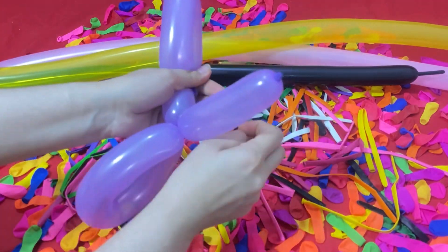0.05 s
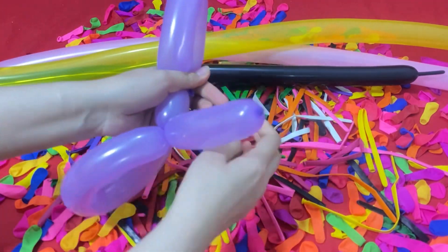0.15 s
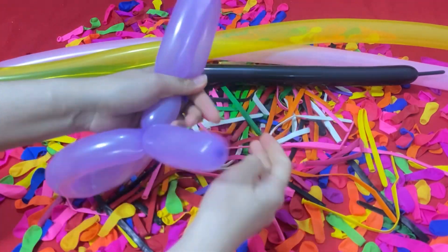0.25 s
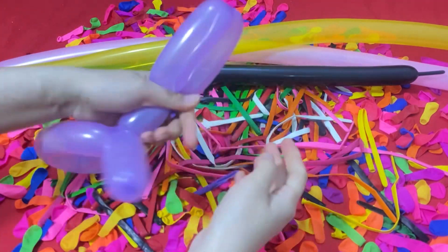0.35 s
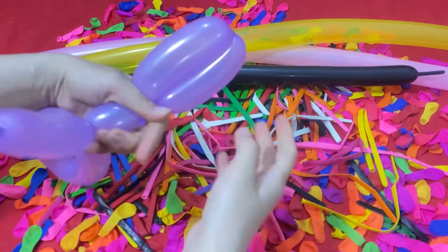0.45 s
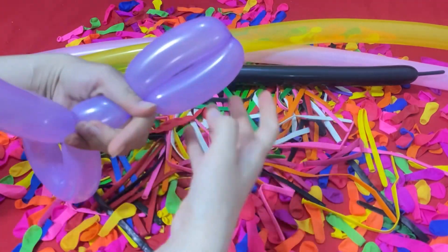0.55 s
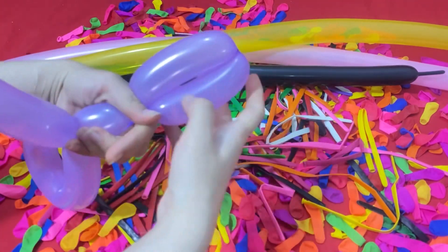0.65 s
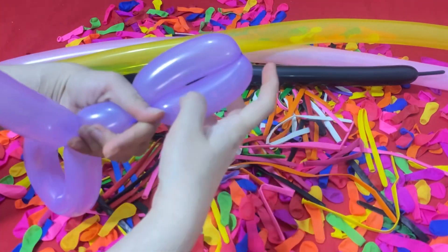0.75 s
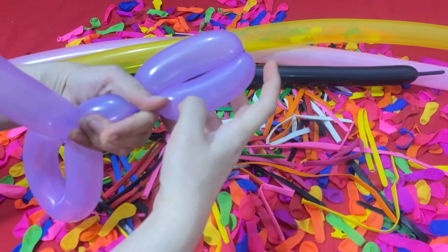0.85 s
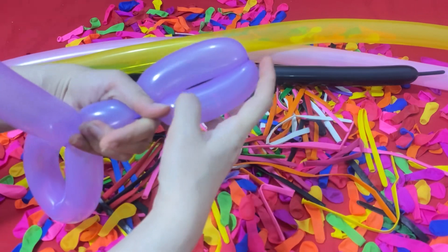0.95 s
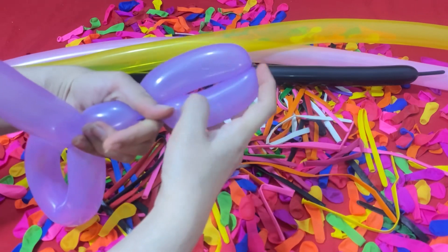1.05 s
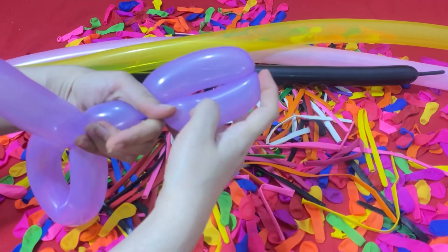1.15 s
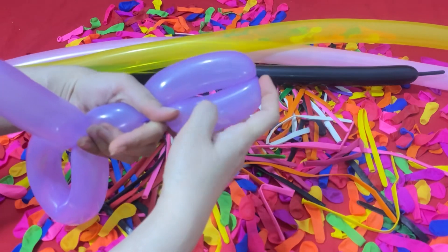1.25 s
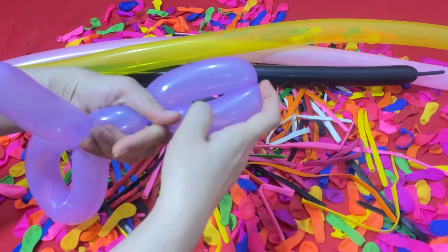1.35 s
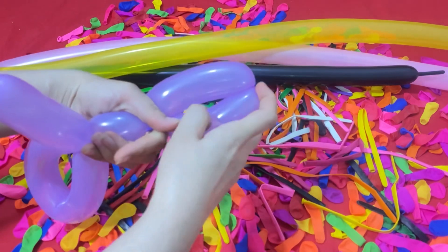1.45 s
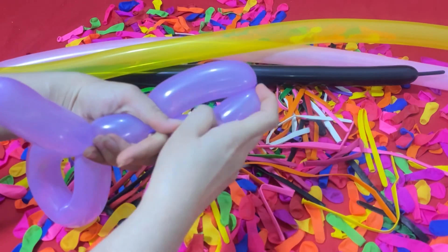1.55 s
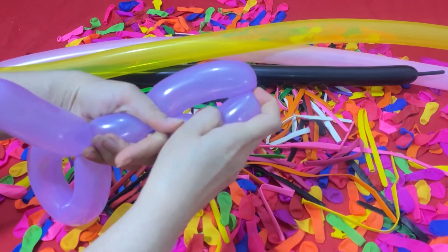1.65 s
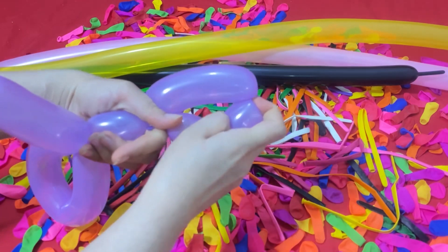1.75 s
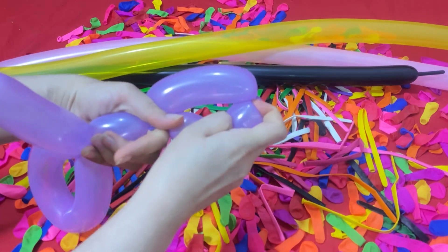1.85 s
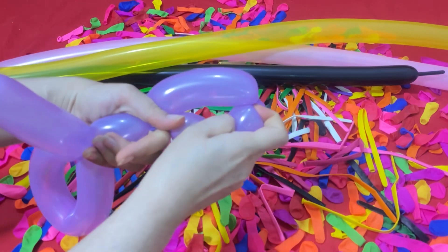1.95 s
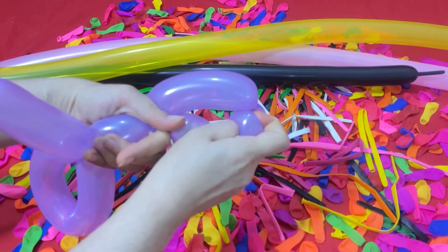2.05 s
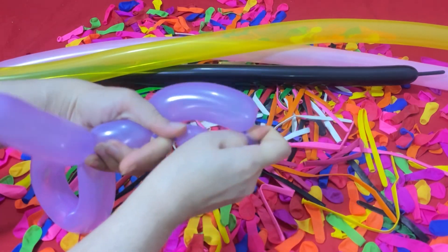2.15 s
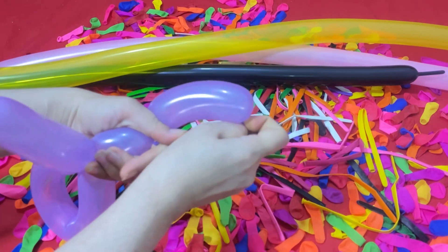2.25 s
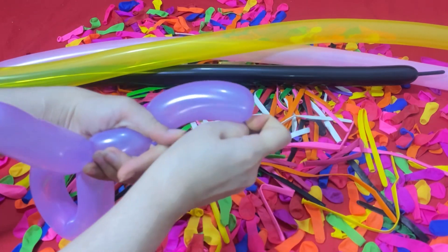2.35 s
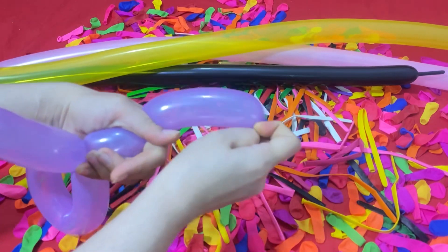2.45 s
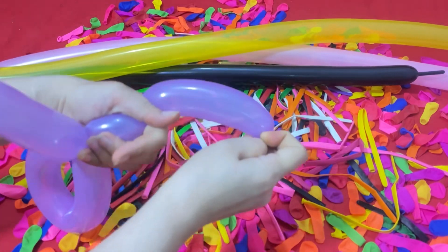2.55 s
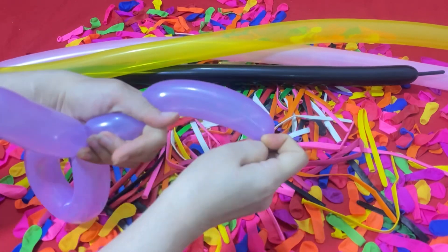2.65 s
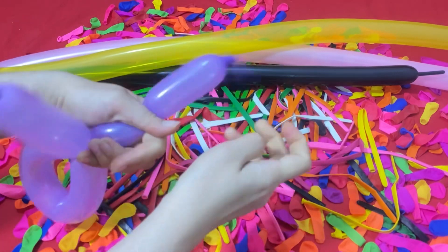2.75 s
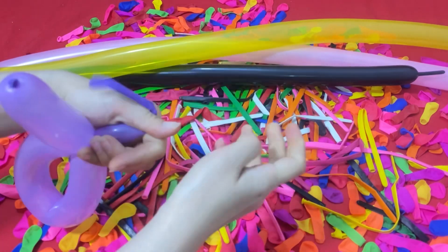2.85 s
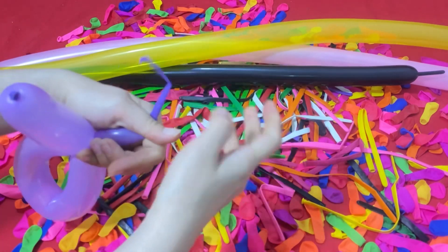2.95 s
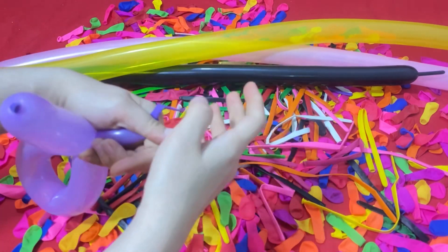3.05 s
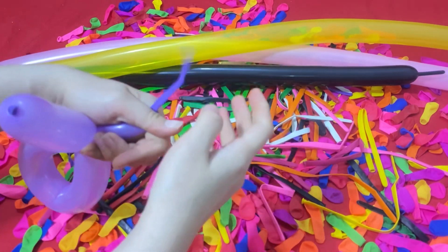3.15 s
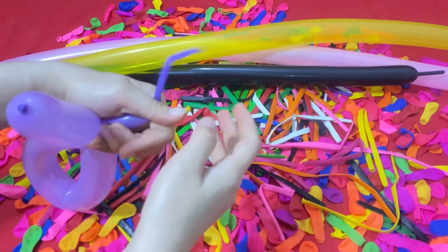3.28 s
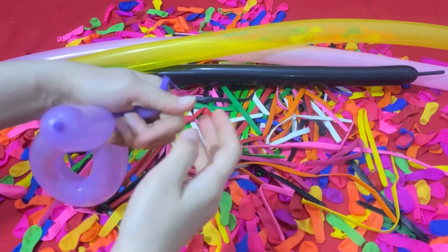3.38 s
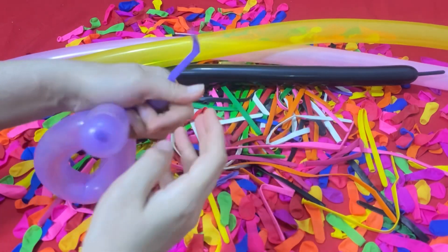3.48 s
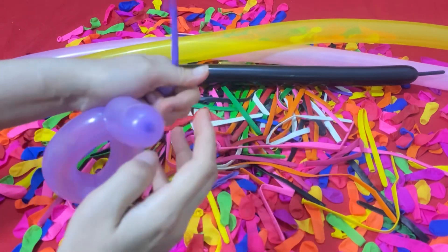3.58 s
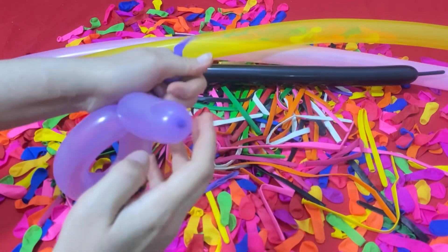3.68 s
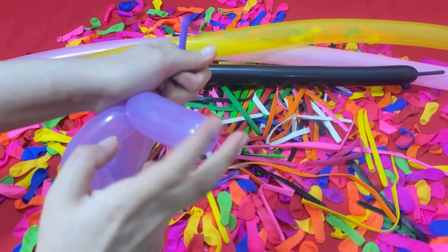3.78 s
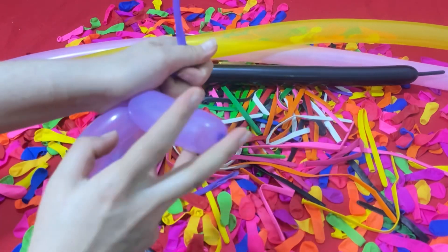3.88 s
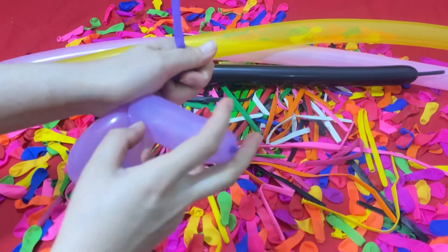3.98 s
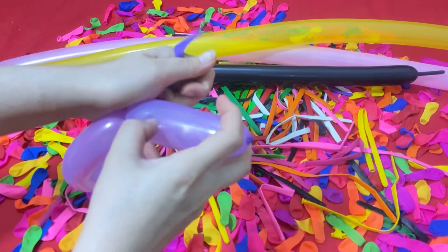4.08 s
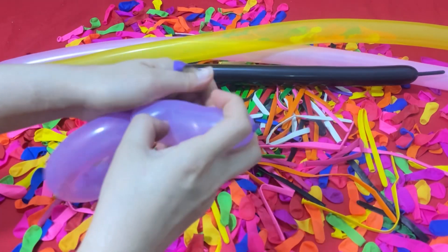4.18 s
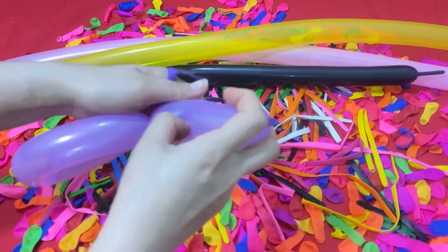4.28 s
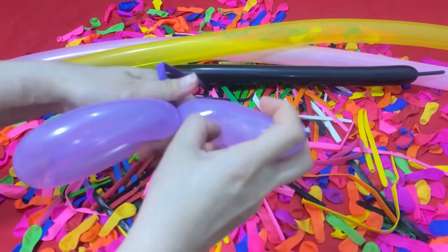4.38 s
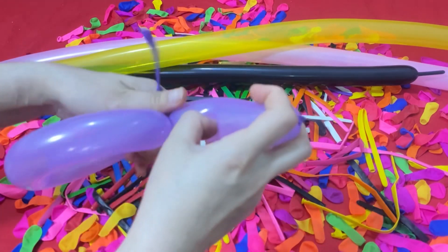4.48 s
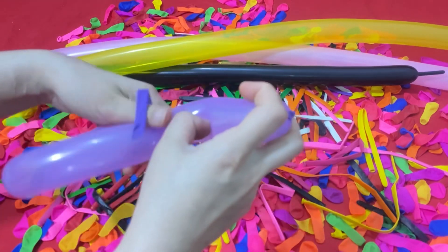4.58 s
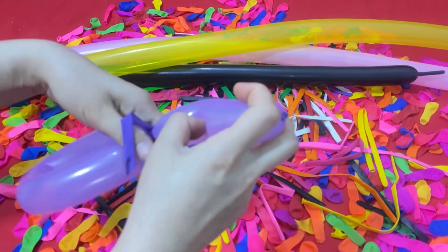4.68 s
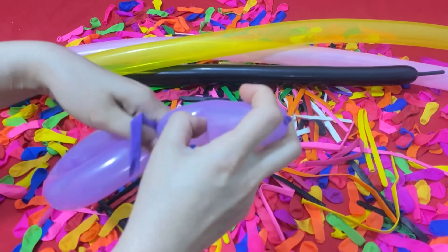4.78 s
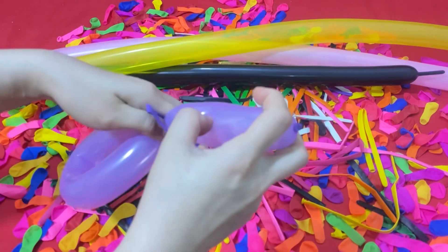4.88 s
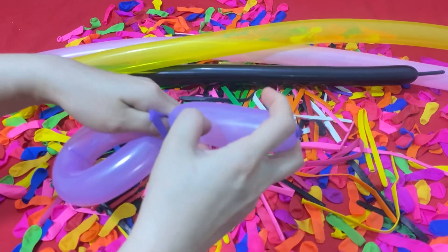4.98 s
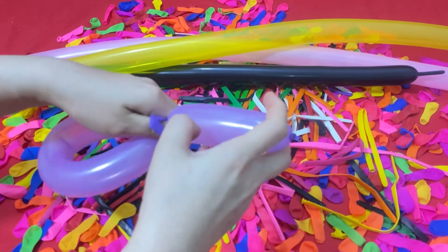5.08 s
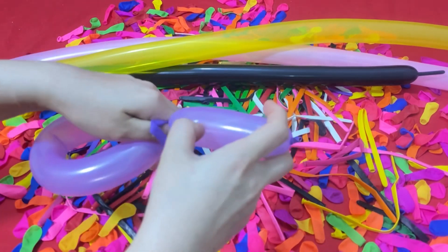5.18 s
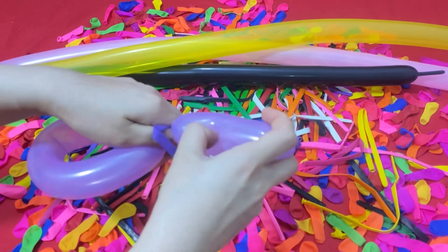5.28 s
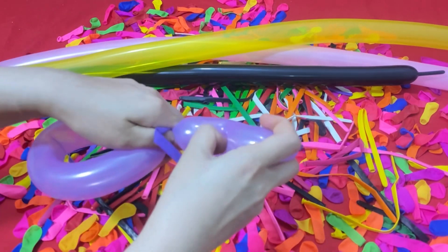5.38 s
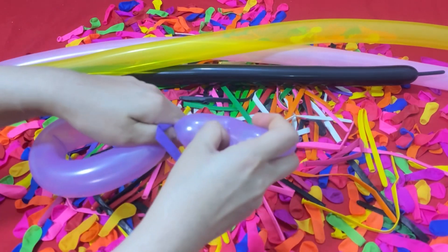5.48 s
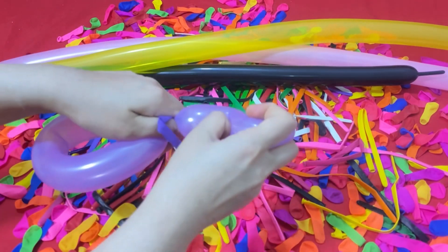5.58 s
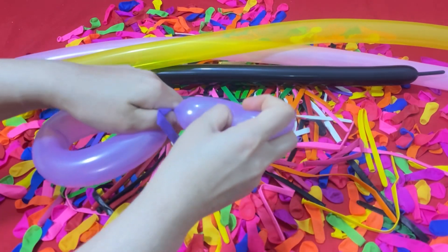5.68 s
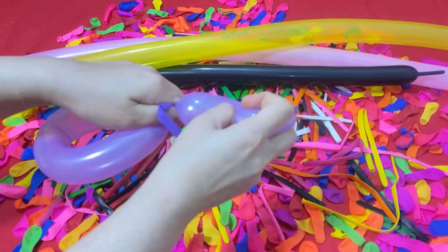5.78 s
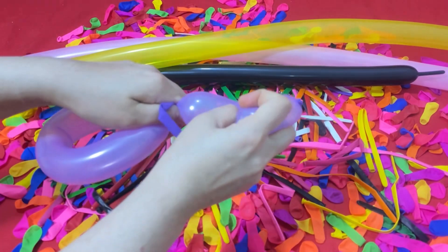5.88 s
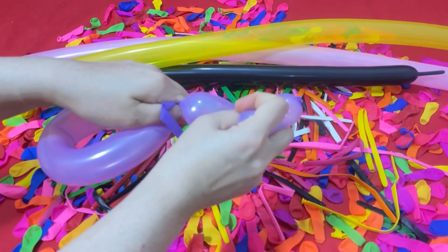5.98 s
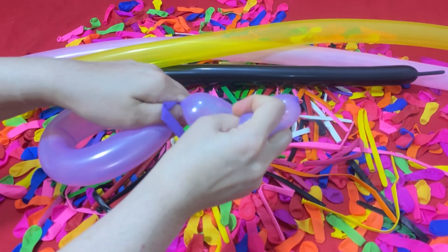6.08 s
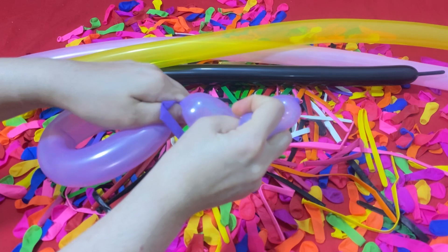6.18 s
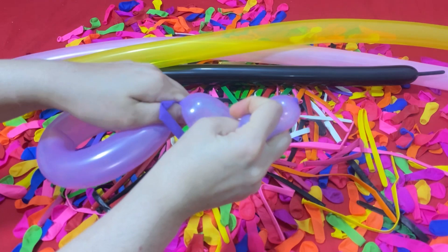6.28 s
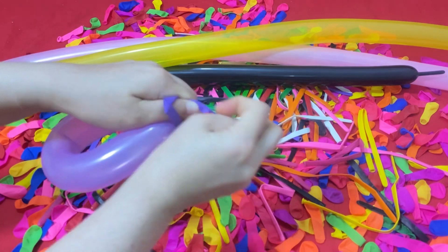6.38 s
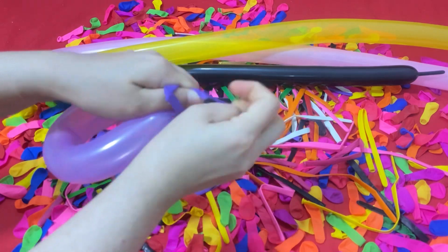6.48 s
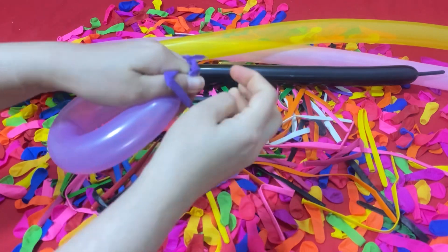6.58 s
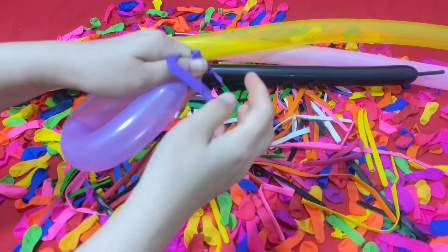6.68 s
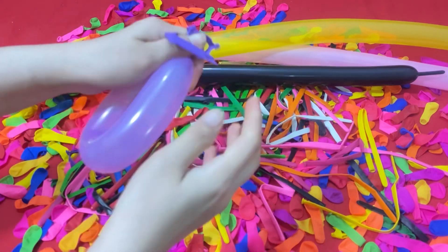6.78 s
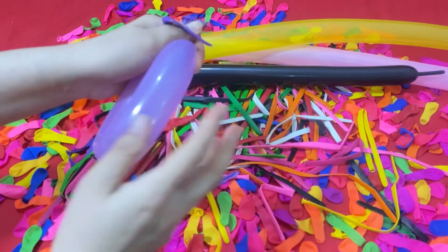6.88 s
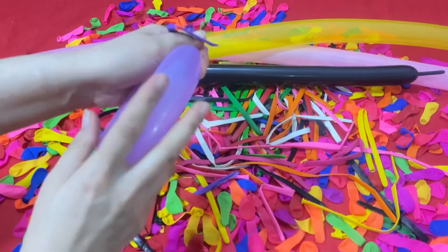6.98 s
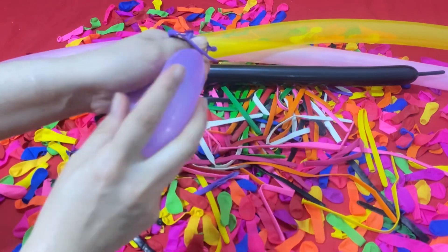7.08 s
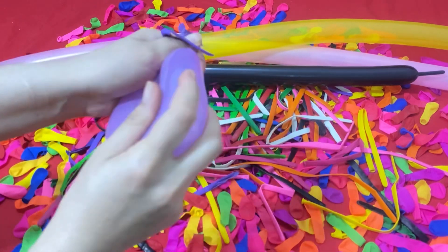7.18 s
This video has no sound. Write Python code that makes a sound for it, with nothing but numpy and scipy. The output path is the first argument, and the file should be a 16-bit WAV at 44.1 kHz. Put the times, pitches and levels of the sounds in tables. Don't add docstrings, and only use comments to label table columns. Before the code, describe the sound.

A burst's echo fades, rubber squeaks and snaps under fingers, a segment vents with a slap, then another balloon pops loudly.

```python
import sys
import numpy as np
from scipy import signal
from scipy.fft import rfft, irfft, next_fast_len
from scipy.io import wavfile
from scipy.ndimage import uniform_filter1d

SR = 44100
rng = np.random.default_rng(int(sys.argv[2]) if len(sys.argv) > 2 else 0)


def materialize(psi):
    bounded = np.clip(np.atleast_2d(psi).T, -1, 1)
    quanta = np.round(bounded * 32767).astype(np.int16)
    wavfile.write(sys.argv[1], SR, quanta)


def to_linear_factor(level_db):
    exponent = np.asarray(level_db, float) / 20
    return 10 ** exponent


N = 319284
LEAD = 8192


def evened(x):
    return x / np.sqrt(np.mean(x ** 2) + 1e-20)


def smooth_noise(shape, width):
    return evened(uniform_filter1d(rng.standard_normal(shape), width))


def read(points, hz):
    f, value = np.transpose(points)
    return np.interp(np.log(hz + 1), np.log(f + 1), value)


def coloured(x, points):
    count = x.shape[-1]
    gain = to_linear_factor(read(points, np.fft.rfftfreq(count, 1 / SR)))
    return evened(irfft(rfft(x) * gain, count))


def add(layer, s, sound, pan_db=0):
    part = layer[:, LEAD + round(s * SR):][:, :len(sound)]
    half_db = np.clip(pan_db, -5, 5) / 2
    part += to_linear_factor([[half_db], [-half_db]]) * sound[:part.shape[1]]


def resonate(x, hz, width):
    turn = np.exp(2j * np.pi * np.cumsum(hz) / SR)
    r = np.exp(-np.pi * width / SR)
    return 2 * (turn * signal.lfilter([1 - r], [1, -r], x / turn)).real


def grains(count, per_s, spread_db):
    hit, size, sign = rng.random(count), rng.exponential(1, count), rng.standard_normal(count)
    return evened((hit < per_s / SR) * sign * to_linear_factor(spread_db * np.minimum(size, 4)))


def controls(rows):
    s, *columns = np.transpose(rows)
    t = np.arange(s[0], s[-1], 1 / SR)
    return s[0], signal.windows.tukey(len(t), 800 / len(t)), [np.interp(t, s, c) for c in columns]


def ring(modes, rise_s, wobble, shiver_s):
    t = np.arange(0, .02 + max(t60 for _, _, t60 in modes), 1 / SR)
    shiver = smooth_noise((len(modes), SR // 3), round(shiver_s * SR))[:, :len(t)]
    t = t[:shiver.shape[1]]
    wave = 0
    for (hz, db, t60), unsteady in zip(modes, shiver):
        tone = np.sin(2 * np.pi * (hz * t + rng.random()))
        wave = wave + to_linear_factor(db - 60 * t / t60) * (1 + wobble * unsteady) * tone
    wave = wave * (1 - np.exp(-(t / rise_s) ** 2))
    return wave / abs(wave).max()


# (f/Hz, level/dB per Hz)
SNAP = [(700, -38.5), (1500, -7), (2600, -5.5), (5000, -7.5), (8000, -7.5), (11000, -9.5), (13500, -26.5),
        (15500, -20.5), (16500, -54)]


def snap(t60, count):
    t = np.arange(count) / SR
    shape = to_linear_factor(-60 * t / t60) * (1 - np.exp(-t / 0.00052))
    z = rfft(rng.standard_normal(4096)[np.arange(count) % 4096] * shape)
    even = irfft(z / abs(z), count)
    wave = coloured(even * np.sqrt(shape), SNAP) * (1 - np.exp(-t / .0003))
    return wave / abs(wave).max()


def slip(db, hz, treble_db, t60, tube):
    modes = []
    for ratio, share_db in tube:
        detune = rng.uniform(.97, 1.03) ** (ratio > 1.1)
        modes.append((hz * ratio * detune, share_db, t60 / ratio ** 0.36))
    body = ring(modes, 0.0006, 0.6, 0.0025)
    return to_linear_factor(db) * body, to_linear_factor(treble_db) * snap(min(0.6 * t60, .018), len(body))


# (f as a ratio to the ring, level/dB)
TUBE = [(.62, 0), (1, 19), (1.55, 1), (2.1, -8), (3.3, -26), (4.401, -37)]
# (f as a ratio to the ring, level/dB)
PIPE = [(1.01, 8), (1.14, 2.5), (1.68, -2), (2.08, 4.5), (2.6, -0.5), (3.5, 4)]
# (t/s, peak level/dB, ring f/Hz, snap level/dB)
PINCH = [(1.085, -50, 930, -49), (1.113, -48, 895, -40.5), (1.115, -47, 1900, -59), (1.39, -60.5, 900, -69),
         (1.652, -55.5, 1600, -57), (1.475, -47, 1930, -48.5), (1.55, -54.5, 1740, -48),
         (1.571, -44.5, 1900, -41), (1.636, -59, 2590, -51), (1.738, -57.5, 2300, -49),
         (1.844, -65.5, 2040, -55), (1.884, -48.5, 1690, -42), (1.93, -65, 2000, -54),
         (1.954, -53.5, 1710, -68), (2.16, -36, 1068, -30), (2.17, -46.5, 1207, -41),
         (2.466, -56.5, 1270, -40.5), (2.654, -62, 1650, -34.5)]
# (t/s, peak level/dB, ring f/Hz, snap level/dB)
PINGS = [
    (2.387, -53, 2960, -39.5),
    (2.398, -43.5, 1703, -34.5),
]
# (t/s, peak level/dB, ring f/Hz, snap level/dB)
WHIP = [
    (2.728, -33, 820, -24),
    (2.741, -34.5, 886, -33.5),
    (2.753, -31.5, 1410, -20.5),
    (2.792, -45.5, 880, -29.5),
    (2.813, -39, 3000, -23.5),
    (2.801, -35.5, 640, -26),
]
# (t/s, peak level/dB, ring f/Hz, snap level/dB)
TURN = [
    (3.954, -72, 2840, -58),
    (4.088, -60, 2330, -39),
    (4.102, -50, 2100, -36.5),
    (7.117, -32.5, 1770, -31.5),
    (7.134, -35.5, 1520, -30),
    (7.149, -29.5, 1990, -34),
    (7.202, -24, 2403, -23.5),
]
# (t/s, peak level/dB, ring f/Hz, snap level/dB)
PRESS = [(4.682, -38, 819, -42.5), (4.714, -33, 833, -37.5), (4.729, -34, 830, -38.5),
         (4.766, -49, 820, -62), (4.79, -50, 820, -56), (4.859, -51.5, 753, -50), (4.954, -47, 706, -48),
         (4.984, -45.5, 1600, -45), (4.998, -51, 625, -60), (5.016, -52, 737, -48), (5.027, -47, 742, -47),
         (5.111, -53, 655, -56), (5.244, -55, 700, -54), (5.273, -57, 693, -68), (5.288, -62, 760, -64),
         (5.33, -63, 860, -57), (5.352, -59, 970, -62), (5.372, -67, 970, -50), (5.39, -59, 920, -52),
         (5.407, -54, 1000, -59), (5.432, -56, 1025, -55)]
# (t/s, peak level/dB, ring f/Hz, snap level/dB)
CREAK = [
    (5.461, -52, 1500, -46),
    (5.485, -50, 1466, -40),
    (5.534, -42.5, 1108, -35),
    (5.577, -38.5, 1684, -44),
]
# (t/s, peak level/dB, ring f/Hz, snap level/dB)
CRUSH = [(5.688, -49, 1590, -39.5), (5.701, -44, 1510, -49), (5.736, -54, 1650, -46),
         (5.78, -35, 1503, -41), (5.859, -76, 1770, -37.5), (5.89, -51, 1690, -43), (6.008, -47, 1760, -42),
         (6.04, -51.5, 1950, -53), (6.115, -59, 4300, -69), (6.102, -60, 1500, -69),
         (6.224, -68, 2500, -52), (6.173, -64, 2810, -50.5), (6.205, -64, 5300, -49),
         (6.235, -59, 4200, -54), (6.278, -63, 2000, -57)]
# (slips, tube, ring t60/s, left-right level/dB, swing from side to side level/dB)
HANDS = [
    (PINCH, TUBE, 0.023, -1.7, .6),
    (PINGS, TUBE, 0.049, -1.3, .3),
    (WHIP, TUBE, 0.015, .3, -8),
    (TURN, TUBE, 0.016, -.6, 0.55),
    (PRESS, PIPE, 0.052, 0.29, .6),
    (CREAK, TUBE, 0.057, -8, -1.5),
    (CRUSH, TUBE, 0.021, -9, 0.25),
]


def play_slips(close, rings):
    for slips, tube, t60, pan_db, swing_db in HANDS:
        for k, (s, db, hz, treble_db) in enumerate(slips):
            side_db = pan_db + swing_db * (-1) ** k
            body, tick = slip(db, hz, treble_db, t60, tube)
            add(rings, s, body, side_db)
            add(close, s, tick, side_db)


def squeak(curve, rings, uneven, smear):
    s, ends, (db, per_s, stretch) = controls(curve)
    wander, size = smooth_noise((2, SR // 4), 200)[:, :len(db)]
    turns = np.cumsum(per_s * (1 + uneven * np.tanh(wander))) / SR
    knocks = evened(np.diff(np.floor(turns), prepend=0))
    drag_on = np.exp(-(turns % 1) / 0.4) * rng.standard_normal(SR // 4)[:len(db)]
    slips = ((1 - smear) * knocks + smear * evened(drag_on)) * to_linear_factor(3 * uneven * size)
    body = 0
    for k, (hz, width, ring_db) in enumerate(rings):
        once = resonate(slips, hz * stretch, width)
        twice = resonate(once, hz * stretch, width)
        body = body + (-1) ** k * to_linear_factor(ring_db) * twice / np.sqrt(width)
    return s, ends * to_linear_factor(db) * evened(body)


# (t/s, level/dB, slip rate f/Hz, stretch of the rings as a ratio)
CHIRP = [
    (1.483, -64, 450, 0.99),
    (1.492, -58, 420, 1.1),
    (1.508, -57, 310, 1),
    (1.523, -52.5, 215, 1.08),
    (1.541, -54, 180, 1),
]
# (t/s, level/dB, slip rate f/Hz, stretch of the rings as a ratio)
GROAN = [
    (5.47, -55, 130.3, 0.94),
    (5.488, -54.5, 139.9, .98),
    (5.505, -51, 141, 1.03),
    (5.535, -44, 159.3, 0.99),
    (5.55, -46.5, 150.1, 0.95),
    (5.568, -47, 139.5, 1.01),
    (5.58, -47.5, 139, 1.01),
    (5.6, -51.5, 130.7, 0.97),
    (5.64, -62, 122, 0.92),
]
# (curve, rings [(f/Hz, width f/Hz, level/dB)], unevenness, smear 0-1, left-right level/dB)
SQUEAKS = [
    (CHIRP, [(1860, 450, -1.5), (2300, 550, -3.5), (2890, 600, -9), (4200, 1200, -15)], 0.035, .15, -.6),
    (GROAN, [(870, 290, -11.5), (1125, 160, 0), (1500, 140, 0.5), (1670, 170, -5), (2030, 170, -9), (2360, 180, -13), (2700, 160, -9), (3290, 200, -14), (4300, 500, -15)], .5, 0.56, -2),
]


def play_squeaks(rings):
    for *beat, pan_db in SQUEAKS:
        add(rings, *squeak(*beat), pan_db)


# (f/Hz, level/dB per Hz)
RUSTLE = [(700, -26.5), (1500, -6.5), (2400, -2), (5000, -8.5), (8000, -9), (11000, -9.5), (13500, -21.5),
          (15500, -22.5), (16500, -49)]
# (f/Hz, level/dB per Hz)
GRIP = [(20, -21), (60, 2.5), (100, -29), (200, 8.5), (400, 2), (700, -5.5), (1500, -43)]


def drag(rows, width_hz):
    s, ends, (creak_db, hz, rustle_db, grip_db) = controls(rows)
    count = len(hz)
    slips = grains(count, 2000, 3.) + .9 * rng.standard_normal(count)
    creak = sum(to_linear_factor(db) * resonate(slips, hz * ratio, width_hz * ratio) for ratio, db in TUBE)
    rustle = coloured(grains(count, 2500, 3.) + .8 * rng.standard_normal(count), RUSTLE)
    grip = coloured(rng.standard_normal(count), GRIP)
    sound = to_linear_factor(creak_db - 7.5) * evened(creak) + to_linear_factor(rustle_db) * rustle + to_linear_factor(grip_db - 14.0) * grip
    return s, ends * sound


def stroke(curve, rustle_db, grip_db, width_hz):
    s, sound = drag([(s, db, hz, db + rustle_db, db + grip_db) for s, db, hz in curve], width_hz)
    lump_db, lump_s = 3.2, 0.017
    lumps = smooth_noise(SR * 2, round(lump_s * SR))
    return s, sound * to_linear_factor(lump_db * lumps[:len(sound)])


# (t/s, pressure level/dB, ring f/Hz)
FOLD = [(.6, -67.5, 1510), (.77, -71, 1650), (1.13, -64.5, 1400), (1.43, -56.5, 1360), (1.5, -62.5, 1950),
        (1.73, -63.5, 1800), (1.8, -64.5, 1500), (2.0, -64.5, 1450), (2.1, -67, 1880)]
# (t/s, pressure level/dB, ring f/Hz)
STRETCH = [
    (2.2, -56, 1730),
    (2.4, -83, 1400),
    (2.57, -87, 1140),
    (2.72, -58.5, 1514),
]
# (t/s, pressure level/dB, ring f/Hz)
LIFT = [(3.7, -100, 1670), (3.81, -70, 2420), (3.92, -70, 1960), (4.164, -50.5, 1910), (4.25, -66, 1910),
        (4.32, -42.5, 1870), (4.52, -86, 2020), (4.66, -73, 1920)]
# (t/s, pressure level/dB, ring f/Hz)
KNEAD = [(4.67, -53, 855), (4.86, -60.5, 770), (5.0, -63, 650), (5.12, -67, 616), (5.2, -66.5, 640),
         (5.28, -66, 740), (5.35, -68, 940), (5.46, -61, 1020)]
# (t/s, pressure level/dB, ring f/Hz)
SQUEEZE = [
    (5.44, -102, 1410),
    (5.52, -65, 1370),
    (5.68, -98, 1500),
    (5.8, -66, 1520),
    (6.06, -67.5, 1860),
    (6.32, -78, 1970),
]
# (t/s, pressure level/dB, ring f/Hz)
REGRIP = [
    (6.85, -48.5, 1400),
    (7.24, -49, 1800),
]
# (curve, rustle level/dB and grip level/dB beside the creak, ring width f/Hz)
STROKES = [
    (FOLD, -27.5, 0.45, 750),
    (STRETCH, -11.5, -32.5, 300),
    (LIFT, -9, -29, 1170),
    (KNEAD, -13.5, -21, 150),
    (SQUEEZE, -2.5, 1, 330),
    (REGRIP, -34, -2.5, 350),
]


def play_strokes(close):
    for row in STROKES:
        add(close, *stroke(*row))


# (start t/s, length t/s, creak level/dB, ring f/Hz, rustle level/dB)
SCRUBS = [(0.674, 0.29, -86, 1600, -66.5), (1.183, .15, -64, 1470, -83), (1.48, 0.088, -81, 2420, -61),
          (1.242, .05, -56, 2110, -75), (3.867, 0.043, -61, 2920, -89), (1.553, 0.17, -74, 1790, -71),
          (3.774, 0.052, -65.5, 2290, -69), (3.948, 0.027, -70, 1970, -58), (4.194, 0.38, -73, 1950, -63),
          (4.736, 0.031, -75, 830, -77), (4.809, 0.074, -51.5, 790, -60.5), (5.313, 0.04, -79, 930, -74),
          (5.644, 0.035, -53, 1650, -80), (5.698, .03, -56, 1510, -75), (5.584, 0.06, -62, 1500, -67),
          (6.204, 0.046, -86, 1900, -66), (6.886, 0.073, -70, 1500, -56), (6.992, 0.095, -70, 1500, -54),
          (7.196, 0.041, -70, 1860, -62)]


def play_scrubs(close):
    swell = [(0, -9.5), (0.36, 0), (1, -8)]  # (share of the length, level/dB)
    for s, length, db, hz, rustle_db in SCRUBS:
        curve = [(s + u * length, db + ease_db, hz) for u, ease_db in swell]
        add(close, *stroke(curve, rustle_db - db, -30, 240))


def twang(db, modes, snap_db):
    body = ring(modes, 0.0014, 0.7, .003)
    return to_linear_factor(db) * (body + to_linear_factor(snap_db) * snap(0.0268, len(body)))


# (f/Hz, level/dB, t60/s)
LOOP = [(405, -13, 0.09), (1260, -11, 0.056), (1737, 2, 0.051), (2066, 4, 0.046), (2160, 2, .04),
        (2750, -18, 0.041), (3060, -8, .05), (3463, 4.5, 0.039), (3510, 7, 0.035), (3960, -0.5, 0.055),
        (4040, 0, 0.034), (4760, -3, 0.035), (5090, -3.5, .05), (5740, 2, 0.034)]
# (f/Hz, level/dB, t60/s)
STUB = [(760, -16, .03), (1484, -3, 0.017), (2246, 0.5, 0.023), (2810, -10, 0.013), (3710, 1, 0.014),
        (4180, -8, .02), (4420, -6.5, .02), (4780, -7, 0.018)]
# (f/Hz, level/dB, t60/s)
SLACK = [(259, -14.5, .05), (596, -2.5, .02), (855, 1, 0.016), (1140, -1.5, 0.019), (1630, -8.5, 0.044),
         (2170, -4.5, 0.02), (2590, -3, 0.017), (3030, -12.5, 0.02)]
# (t/s, peak level/dB, tones, snap level/dB)
STRIKES = [
    (2.437, -27, SLACK, -8),
    (4.16, -23, STUB, 1),
    (4.307, -20.5, LOOP, -1.5),
]
# (t/s, level/dB, rise t/s, [(f/Hz, level/dB, t60/s)])
HOOT = (4.31, -42, 0.021, [(395, 0, 0.39), (418, -1.5, 0.25)])


def play_twangs(close, rings):
    for s, *strike in STRIKES:
        add(close, s - .001, twang(*strike), -1)
    s, db, rise_s, modes = HOOT
    add(rings, s, to_linear_factor(db) * ring(modes, rise_s, .5, 0.0116))


# (f/Hz, level/dB per Hz)
CRACK = [(180, -11), (400, -7), (800, 2), (1900, -5), (3500, -3), (7500, -6), (11000, -12), (15700, -29),
         (16500, -42)]
# (tear t/s, crack level/dB, push level/dB)
BURST = (6.341, 4.15, 7.7)


def burst(s, crack_db, push_db):
    t = np.arange(-SR // 60, SR // 20) / SR
    since = t - t[0]
    run = to_linear_factor(1850 * np.minimum(t, 0) - 6000 * np.maximum(t - .0085, 0)) * np.minimum(1, since / 0.0098)
    tearing = rng.standard_normal(len(t)) * to_linear_factor(1.4 * smooth_noise(len(t), 40))
    z = rfft(run * tearing)
    even = irfft(z / uniform_filter1d(abs(z), size=15), len(t))
    crack = np.sqrt(np.mean(run ** 2)) * coloured(even, CRACK) * np.minimum(1, since / 0.0027)
    flap = to_linear_factor(-11) * np.sqrt(run) * np.sin(2 * np.pi * 285 * t)
    after = np.maximum(t - .004, 0)
    push = np.sin(np.pi * np.log(1 + after / .0033) / np.log(1.6)) * np.exp(-after / .0058)
    return s + t[0], to_linear_factor(crack_db) * (crack + flap) + to_linear_factor(push_db) * push


# (t/s, level/dB, [(f/Hz, level/dB per Hz)])
FRONTS = [
    (-.09, 26.62, [(40, -25.5), (150, -16.5), (300, -6), (600, -6.5), (1000, -5.5), (1700, 2.5), (2600, -6.5), (5000, -14.5), (9000, -23), (16000, -25)]),
    (6.337, 30.68, [(40, -9), (150, -8.5), (300, -6), (500, -8.5), (800, -2), (1700, -4.5), (3200, 2), (5000, -6.5), (9000, -8), (12000, -8), (16000, -21.5)]),
]


def play_fronts(fronts):
    for s, db, points in FRONTS:
        pulse = np.roll(coloured(np.arange(1024) == 0, points), 300)
        add(fronts, s, to_linear_factor(db) * pulse / np.linalg.norm(pulse))


# (f/Hz, level/dB per Hz)
JET = [(470, -35.5), (1000, -6), (3750, -6), (7300, -2.5), (10600, -0.5), (13000, -8), (15700, -8),
       (16500, -44)]
# (f/Hz, level/dB per Hz)
FLUTTER = [(18, -49), (30, -13.5), (377, 2), (508, -9.5), (564, -5.5), (1770, -8), (2000, -8.5),
           (2600, -30.5), (4400, -120)]


def vent(rows, treble_db):
    s, ends, (rush_db, flutter_db) = controls(rows)
    count = len(ends)
    spit = to_linear_factor(1.6 * smooth_noise(count, 90))
    hiss = [(hz, db + treble_db * (hz > 9000)) for hz, db in JET]
    jet = coloured(rng.standard_normal(count) * spit, hiss)
    flutter = coloured(rng.standard_normal(count) * spit, FLUTTER)
    return s, ends * (to_linear_factor(rush_db) * jet + to_linear_factor(flutter_db) * flutter)


# (start t/s, length t/s, rush level/dB, flutter level/dB, swell level/dB, treble level/dB)
VENTS = [
    (2.092, 0.12, -40.5, -73, -1, 5.5),
    (2.718, 0.077, -33.5, -40, -7, -2.5),
    (2.756, 0.087, -45, -46, 7.5, 0),
]


def play_vents(close):
    for s, length, rush_db, flutter_db, swell_db, treble_db in VENTS:
        opening = [(0, -17), (0.26, 0), (0.7, swell_db), (1, -32.5)]  # (share of the length, level/dB)
        curve = [(s + u * length, rush_db + db, flutter_db + .5 * db) for u, db in opening]
        add(close, *vent(curve, treble_db))


# (t/s, peak level/dB, f/Hz, t60/s)
BUMPS = [
    (0.677, -67, 80, 0.13),
    (1.348, -64, 70, 0.11),
    (2.15, -64, 79.4, 0.091),
    (2.463, -52, 238, 0.035),
    (2.80, -47, 66.5, 0.47),
    (3.969, -62, 148, 0.043),
    (4.309, -52, 63, 0.26),
    (5.113, -58, 236, 0.054),
]


def play_bumps(rings):
    for s, db, hz, t60 in BUMPS:
        add(rings, s, to_linear_factor(db) * ring([(hz, 0, t60), (1.3 * hz, -4, t60)], 0.0016, 0.64, 0.0018))


# (t/s, level/dB, t60/s)
SHUDDERS = [
    (1.399, -70, 0.6),
    (2.431, -57.5, 0.54),
    (2.7, -66, 0.33),
    (3.96, -61, 0.11),
    (4.298, -59.5, 0.42),
    (5.57, -71, 0.96),
]


def play_shudders(close):
    t = np.arange(SR // 2) / SR
    for s, db, t60 in SHUDDERS:
        fade = to_linear_factor(db - 60 * t / t60) * np.minimum(t / 0.015, 1)
        add(close, s, fade * coloured(rng.standard_normal(len(t)), GRIP))


# (f/Hz, t60/s)
ROOM = [(60, 0.15), (200, 1.42), (800, 1.56), (2000, 1.375), (4500, 1.17), (9000, 0.72), (12000, 0.5),
        (14000, 0.071)]
# (f/Hz, likeness 0-1)
SAME = [(60, 0.84), (300, 0.93), (600, 0.15), (1100, 0.13), (2000, 0.88), (5500, 0.096), (7500, 0.051),
        (8200, 1), (9300, 0.84), (16000, 0.58)]


def room(x):
    taps = np.zeros((2, 2 * SR))
    at = np.arange(150, 2 * SR - 20, 10) + rng.integers(0, 10, (2, (2 * SR - 161) // 10))
    np.put_along_axis(taps, at, rng.choice([-1., 1.], at.shape), 1)
    hz, t, z = signal.stft(taps, SR, nperseg=512)
    same = np.clip(read(SAME, hz), 0, 1)[:, None]
    z = np.array([z[0], same * z[0] + np.sqrt(1 - same ** 2) * z[1]])
    z = z * (1 + 1.36 * np.exp(-t / .015))
    fade = to_linear_factor(-60 * t / read(ROOM, hz)[:, None])
    tail = signal.istft(z * fade, SR, nperseg=512)[1]
    return signal.fftconvolve(x[None], tail / np.linalg.norm(tail[0]), axes=1)[:, :len(x)]


# (f/Hz, level/dB per Hz)
HUSH = [(15, -51.5), (25, -16), (92, -3.5), (123, -24.5), (161, -11), (326, -21), (796, -13.5), (887, -19),
        (5430, -29.5), (16000, -37)]
# (f/Hz, rms level/dB)
HUM = [(101, -91.5), (199, -89.5)]


def hush():
    t = np.arange(N) / SR
    air = rng.standard_normal((3, N))
    hum = sum(to_linear_factor(db) * np.sqrt(2) * np.sin(2 * np.pi * hz * t) for hz, db in HUM)
    return to_linear_factor(-79) * coloured(air[:2] + 0.34 * air[2], HUSH) + hum


def scene():
    close, rings, near, fronts = np.zeros((4, 2, LEAD + N))
    play_slips(close, rings)
    play_squeaks(rings)
    play_strokes(close)
    play_scrubs(close)
    play_twangs(close, rings)
    add(near, *burst(*BURST), 2)
    play_fronts(fronts)
    play_vents(close)
    play_bumps(rings)
    play_shudders(close)
    into_room = to_linear_factor(-10) * close + to_linear_factor(-13) * rings + to_linear_factor(-9) * fronts
    heard = near + close + rings + room(into_room.mean(0))
    return heard[:, LEAD:] + hush()


# (f/Hz, phase/radians)
PORTS = [(0, 0), (350, .5), (700, 0), (1200, -.9), (6000, -1.2), (7100, 0), (8350, 3.0), (9250, 3.3),
         (10600, 6.2), (11800, 6.6), (12900, 9.3), (14300, 9.55), (15000, 12.5)]
# (f/Hz, left-right level/dB)
TILT = [(100, -1.5), (1100, 3), (2000, -0.5), (5500, -3), (7600, -1), (8300, 1.5), (9200, 0.4), (10000, 1)]


def microphones(dry):
    size = next_fast_len(N + 4096)
    hz = np.fft.rfftfreq(size, 1 / SR)
    lead = np.exp(.5j * np.interp(hz, *np.transpose(PORTS))) * to_linear_factor(read(TILT, hz) / 2)
    edge = 1 / (1 + (hz / 15950) ** 120)
    return irfft(rfft(dry, size) * edge * [lead, 1 / lead], size)[:, :N]


# (t since the burst/s, level/dB)
LIMITER = [(-.01, 0), (0, -19), (.07, -11.5), (.17, -10.5), (.27, -3.5), (.36, 0)]
# (t/s, share of the full depth)
CLAMPS = [
    (-.11, 0.86),
    (6.326, 1.017),
]


def limiter(ports):
    t = np.arange(N) / SR
    clamp_db = sum(depth * np.interp(t - s, *np.transpose(LIMITER)) for s, depth in CLAMPS)
    return np.tanh(ports * to_linear_factor(clamp_db) / 1.091) * 1.112


def low_pass(x):
    return signal.sosfilt(signal.butter(12, 16990, fs=SR, output="sos"), x)


def record(dry):
    mix = limiter(microphones(dry))
    return low_pass(mix)


dry = scene()
out = record(dry)
materialize(out)
```